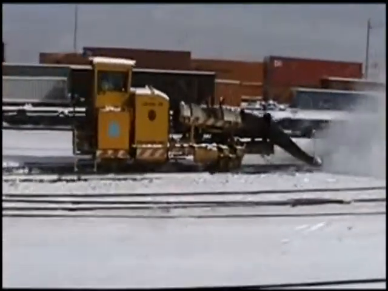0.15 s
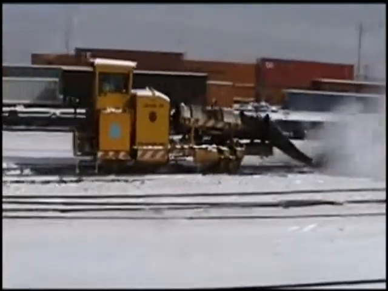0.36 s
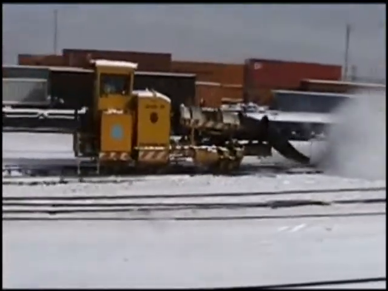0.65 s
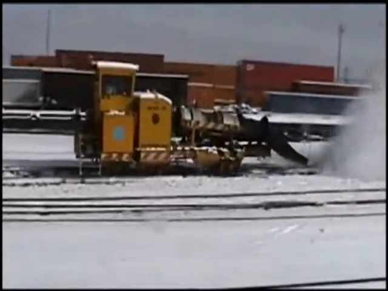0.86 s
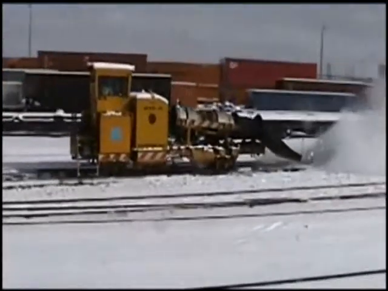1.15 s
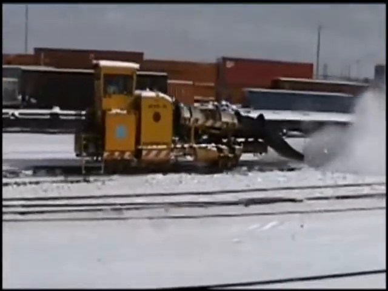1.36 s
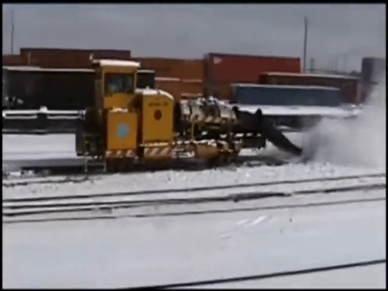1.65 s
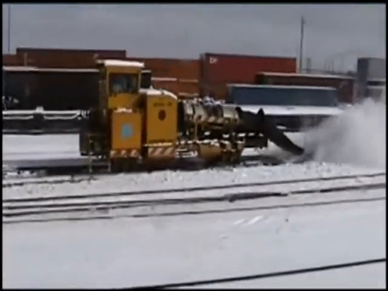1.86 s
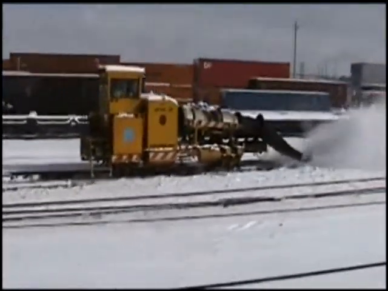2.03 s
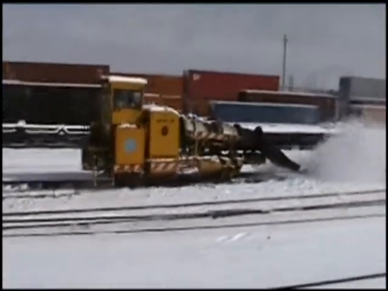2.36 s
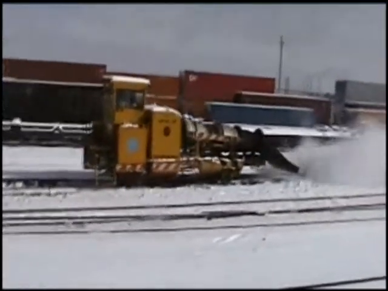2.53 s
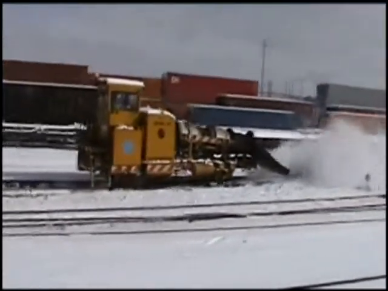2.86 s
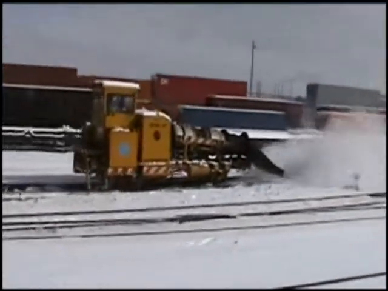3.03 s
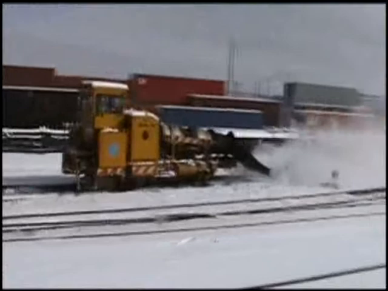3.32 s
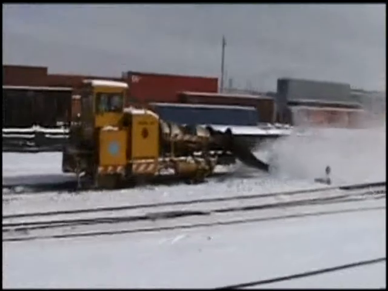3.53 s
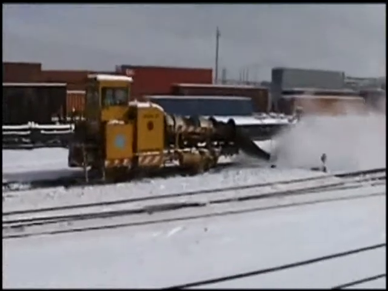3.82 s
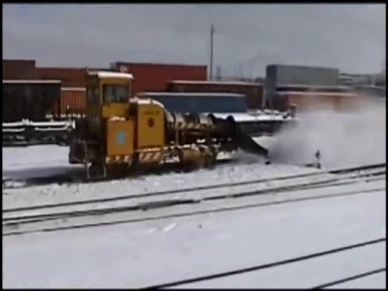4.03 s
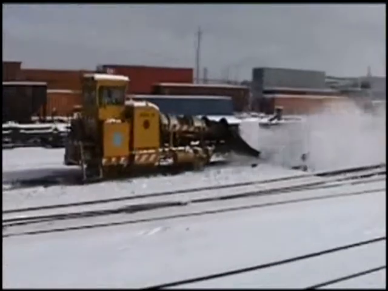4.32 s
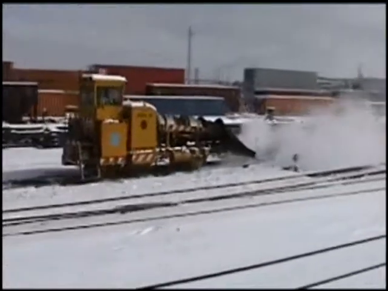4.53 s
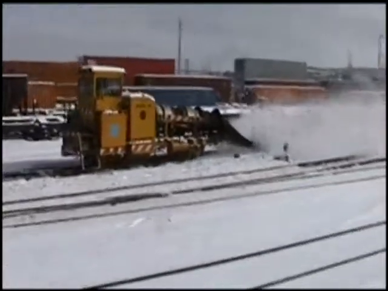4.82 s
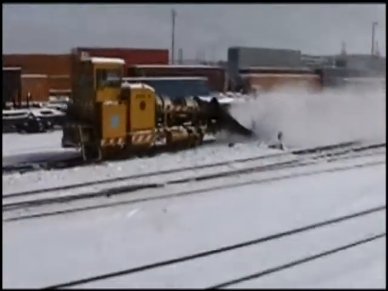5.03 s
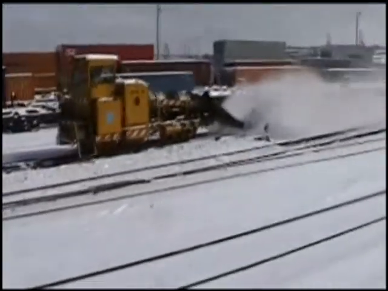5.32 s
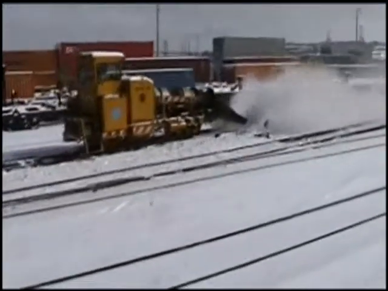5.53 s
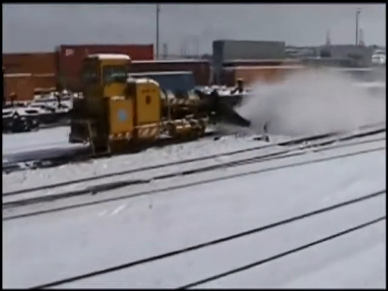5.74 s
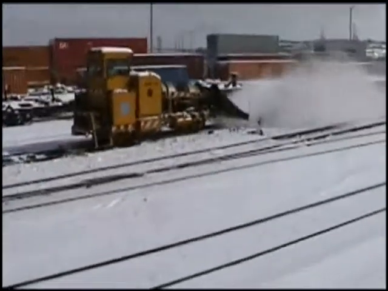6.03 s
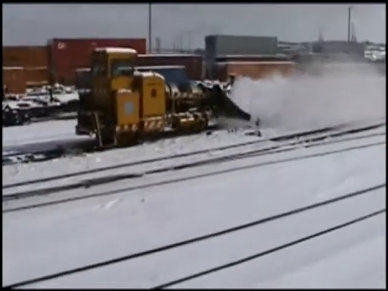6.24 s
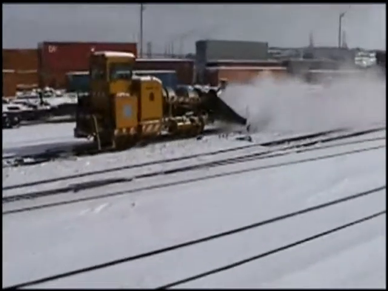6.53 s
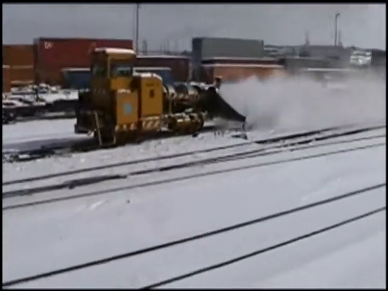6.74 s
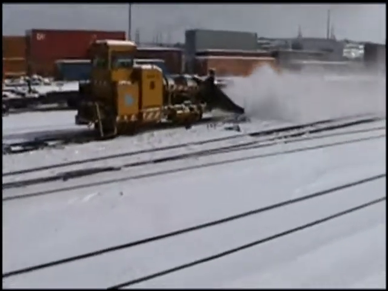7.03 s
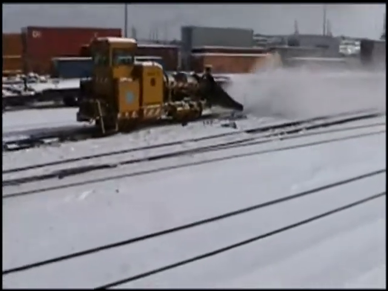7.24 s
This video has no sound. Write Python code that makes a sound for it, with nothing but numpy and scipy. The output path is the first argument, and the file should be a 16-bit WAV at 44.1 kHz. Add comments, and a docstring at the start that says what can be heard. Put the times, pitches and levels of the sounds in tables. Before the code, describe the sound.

A jet-powered snow blower creeps along rails in an open snowy yard, roaring without pause. Over the broad, hollow blast sits a rough metallic turbine whine, strongest at first. As it turns tail-on the whine loses its top and the roar grows more mid-heavy, while thin high whistles surge in gusts. A low, breathy moan climbs near the end. Small outdoor stereo camera microphone at some distance, narrow-band, peaks slightly squashed.

```python
"""A jet snow blower on rails roars at the snow of a rail yard as it creeps past: noise shaped by frequency.
Its blades whine on multiples of a nearly steady shaft speed, over a faint echo of steady tones.
As it turns from side-on to tail-on the whine loses its top; drifting air makes every tone flutter.
Gusts make two high whistles surge, over a nearly steady band of hiss, a low whistle and faint gear tones.
Late on, a hollow moan climbs out of the blast; the camera's input slightly rounds off the loud peaks."""
import sys
import numpy as np
from scipy import signal
from scipy.io import wavfile
from scipy.ndimage import uniform_filter1d

SR = 44100
rng = np.random.default_rng(int(sys.argv[2]) if len(sys.argv) > 2 else 0)


def log_audio(samples):
    """Write samples as a 16-bit WAV file to the path given in sys.argv[1]."""
    # one column per channel
    frames = np.atleast_2d(samples).T
    # limit to full scale, then quantise
    limited = np.clip(frames, -1, 1)
    pcm = np.round(limited * 32767).astype(np.int16)
    wavfile.write(sys.argv[1], SR, pcm)


N = 325458
TIME = np.arange(N) / SR  # seconds, one value per sample
SLOW_TIME = np.linspace(0, N / SR, num=8192)  # seconds, a coarse grid for slow changes


def amp(db):
    """Turns decibels into a gain."""
    return 10 ** (np.asarray(db) / 20)


def evened(x):
    """Scales a signal to a mean power of one."""
    return x / np.sqrt(np.mean(abs(x) ** 2) + 1e-20)


def curves(rows, t=TIME):
    """Joins each column of a time table by straight lines."""
    seconds, *columns = np.transpose(rows)
    return [np.interp(t, seconds, column) for column in columns]


def read(rows, hz, axis=1):
    """Reads one column of a spectrum table, on a log-frequency axis."""
    table = np.transpose(rows)
    return np.interp(np.log(hz + 1), np.log(table[0] + 1), table[axis])


# which side of the machine faces us: time_s, view (0 is side-on, 1 is from behind)
VIEW = [(0, 0.13), (1, -0.058), (2, 0.12), (2.7, 0.25), (3.4, 0.59), (4.2, 0.86), (5, 0.92), (6, 1.08),
        (7.38, 1.1)]


def by_view(views, levels_db):
    """A sound that beams unevenly changes level as the machine turns."""
    return np.interp(curves(VIEW, SLOW_TIME)[0], views, levels_db)


# balance of the two microphones: pitch_hz, left_minus_right_db
BALANCE = [(50, 3.3), (200, 4.1), (600, 2), (950, .2), (1300, 0), (1620, .8), (1900, 0), (4400, -.2),
           (5000, 1.3), (5600, 0), (6700, .3), (7500, 1.6)]
# how far the left microphone leads the right: pitch_hz, lead_radians
LEAD = [(50, 0), (300, -.35), (750, -.4), (1400, -.04), (1620, -.2), (1950, 0), (4200, 0), (4800, .18),
        (5300, -.05), (7300, .16)]


def ports(hz):
    """Loudness and phase differences give a complex gain for the left and right microphone."""
    half = amp(read(BALANCE, hz) / 2) * np.exp(.5j * read(LEAD, hz))
    return np.array([half, 1 / half])


def drift(width_hz):
    """Slow complex chance of power one, with soft skirts beyond its width."""
    f = np.fft.fftfreq(len(SLOW_TIME), SLOW_TIME[1])
    a, b = rng.standard_normal((2, len(f)))
    return evened(np.fft.ifft((a + 1j * b) / (1 + (f / width_hz) ** 2)))


# how alike the two microphones hear a sound: pitch_hz, likeness (0 to 1)
LIKENESS = [(40, .2), (120, .62), (250, .89), (480, .77), (650, .93), (1100, .95), (2000, .995),
            (2700, .9998), (3350, .9998), (3700, .98), (4500, .92), (6300, .92), (7200, .82)]


def tone(hz, db, scatter, width_hz, fuzz_db=None):
    """A tone arrives partly direct and partly scattered by moving air, so that it flutters."""
    share, centre_hz = np.clip(scatter, 0, 1), np.mean(hz)
    paths = np.sqrt(1 - share) + np.sqrt(share) * drift(width_hz)
    if fuzz_db is not None:  # fast eddies in the hot exhaust smear it into a skirt of noise
        paths = paths + amp(fuzz_db) * drift(width_hz=73)
    # reflections from the yard reach the two microphones unlike
    unlike = np.sqrt((1 - read(LIKENESS, centre_hz)) / 2) * drift(width_hz)
    pair = np.array([paths + unlike, paths - unlike]) * ports(centre_hz)[:, None]
    # pitch changes are added up as turns, from a random starting phase
    offset_hz = (hz - centre_hz) * np.ones(len(SLOW_TIME))
    turns = np.cumsum(offset_hz) * SLOW_TIME[1] + rng.random()
    pair = pair * np.sqrt(2) * amp(db) * np.exp(2j * np.pi * turns)
    carrier = np.exp(2j * np.pi * centre_hz * TIME)
    return np.array([(np.interp(TIME, SLOW_TIME, side) * carrier).real for side in pair])


def turbulence(field_db, patchy_db, size=2048):
    """Stereo noise gets its density from field_db(s, Hz) and is broken into drifting patches."""
    hop = size // 4
    t = np.arange(N // hop + 3) * hop / SR
    hz = np.fft.rfftfreq(size, 1 / SR)
    a, b, c, d, patches = rng.standard_normal((5, len(t), len(hz)))
    patches = uniform_filter1d(patches, size=12, axis=0)  # smooth over time
    patches = evened(uniform_filter1d(patches, size=24, axis=1))  # smooth over pitch
    same = np.clip(read(LIKENESS, hz), -1, 1)
    left = a + 1j * b
    right = same * left + np.sqrt(1 - same ** 2) * (c + 1j * d)
    z = np.array([left, right]) * ports(hz)[:, None]
    z *= amp(field_db(t, hz) + patchy_db * patches) * np.sqrt(1.5 * SR / size)
    return signal.istft(z.swapaxes(-1, -2), nperseg=size, noverlap=size - hop)[1][:, :N]


# faint steady gear tones: pitch_hz, level_db
GEAR_TONES = [(1229, -51), (1507, -51.5)]


def gears():
    """The gears hum on fixed pitches, fluttering slowly in the air."""
    return sum(tone(hz, db, scatter=0.25, width_hz=4.4) for hz, db in GEAR_TONES)


# level of the low whistle: time_s, level_db
LOW_WHISTLE_DB = [(0, -48), (1.9, -44.5), (2.1, -42), (3, -38), (3.12, -36.5), (4.3, -35.5), (5.1, -38),
                  (5.8, -36.5), (7.38, -43.5)]


def low_whistle():
    """One clean whistle keeps a pitch unrelated to the shaft while its level wanders."""
    level_db = curves(LOW_WHISTLE_DB, SLOW_TIME)[0]
    return tone(1619.2, level_db, scatter=0.06, width_hz=12, fuzz_db=-19.0)


# gusts that make the high whistles surge: start_s, length_s, lower_whistle_db, upper_whistle_db
SURGES = [(1.3, .22, -44, -52), (2.43, 0.35, -41, -53), (2.8, 0.25, -48, -44), (3.3, 0.29, -40, -41),
          (4.248, 0.23, -56, -42), (4.6, 0.48, -41, -38.5), (5.157, 0.3, -43, -36.5),
          (5.72, 0.39, -48, -43.5), (6.002, 0.28, -37.5, -41), (6.235, 0.37, -41.5, -44.5),
          (6.61, 0.34, -45, -41.5), (6.95, 0.67, -39.5, -58)]


def surges():
    """Gusts add power to each high whistle: a quick rise, a hold and a fall."""
    attack_s, release_s = .08, 0.14
    power = np.zeros((2, len(SLOW_TIME)))
    for start, length, *db in SURGES:
        age = SLOW_TIME - start
        shape = np.clip(np.minimum(age / attack_s, (length - age) / release_s), 0, 1)
        power += (amp(db)[:, None] * shape) ** 2
    return power


# the two high whistles between surges: pitch_hz, side_on_db, from_behind_db
HIGH_WHISTLES = [(4376, -50.5, -47.5), (4821, -49, -45.5)]


def high_whistles():
    """Two fuzzy whistles hold their pitch and swell as gusts add to their calm power."""
    total = 0
    for (hz, *calm_db), surge in zip(HIGH_WHISTLES, surges()):
        power = amp(by_view([0, 1], calm_db)) ** 2 + surge
        total = total + tone(hz, 10 * np.log10(power), scatter=0.24, width_hz=14, fuzz_db=-9.5)
    return total


# shape of the rush of air through the blades, before its overall level is set: pitch_hz, relative_db
RUSH = [(3600, -27), (4150, -3.5), (4400, 0), (4650, -3.5), (4850, -6), (5150, -5.5), (5600, -28.5)]


def rush():
    """Air rushing through the blades hisses almost steadily around the high whistles."""
    hiss = evened(turbulence(lambda t, hz: read(RUSH, hz), patchy_db=1.4))
    calm_db = by_view([0, 1], [-43.5, -42.5])
    surge_db = -14.5  # relative to the power of the whistle surges, so it barely lifts the hiss
    power = amp(calm_db) ** 2 + amp(surge_db) ** 2 * surges().sum(axis=0)
    return hiss * np.interp(TIME, SLOW_TIME, np.sqrt(power))


# a hollow moan that climbs as the machine turns: time_s, pitch_hz, level_db
MOAN = [(4.4, 785, -63), (4.9, 787, -47), (5.55, 780, -49), (5.9, 942.4, -50.5), (6.45, 934, -56),
        (6.65, 1003, -51.5), (6.9, 1030, -40.5), (7.38, 1034, -42)]


def moan():
    """A breathy, wavering note rises out of the blast, mostly scattered by the air."""
    hz, db = curves(MOAN, SLOW_TIME)
    return tone(hz, db, scatter=.7, width_hz=20, fuzz_db=-10.5)


# shaft speed as heard: time_s, turns_per_second
SHAFT = [(0, 55.53), (2.3, 55.5), (3.8, 55.41), (5, 55.45), (7.38, 55.42)]


def shaft_speed():
    """The turning shaft sets the pitch of every directly heard blade tone."""
    return curves(SHAFT, SLOW_TIME)[0]


# weaker tones, before a shared lift of 1.05 dB: shaft_multiple, side_on_db, slanted_db, from_behind_db
SHAFT_TONES = [(37, -47, -50, -57), (38, -54, -59, -60), (39, -61, -59, -69), (42, -61, -60, -70),
               (46, -57, -61, -68), (49, -57, -59, -67), (51, -52, -53, -61), (53, -61, -52, -57),
               (64, -53, -56, -61), (65, -44, -47, -53), (66, -61, -67, -69), (80, -54, -54, -65),
               (81, -46, -46, -57), (83, -54, -56, -63), (84, -58, -56, -65), (92, -50, -51, -66),
               (93, -59, -64, -65), (101, -59, -68, -71), (108, -59, -61, -62), (109, -61, -62, -70),
               (110, -48, -67, -64), (111, -60, -68, -72), (119, -55, -55, -69), (129, -62, -61, -73)]


def weak_blade_tones():
    """Weaker multiples of the shaft speed beam unevenly, and flutter more from behind."""
    speed, behind = shaft_speed(), np.clip(curves(VIEW, SLOW_TIME)[0], 0, 1)
    total = 0
    for multiple, *beam_db in SHAFT_TONES:
        level_db = by_view([.08, .22, .58], beam_db)
        total = total + tone(multiple * speed, level_db, scatter=0.15 + .5 * behind,
                             width_hz=10.0, fuzz_db=-10.5)
    return amp(1.05) * total


# level of the lower whine, near 1.5 kHz, and of the upper, near 3 kHz: time_s, level_db
LOW_WHINE_DB = [(0, -38), (.2, -42), (.35, -36.5), (1.2, -39), (1.4, -39), (1.75, -38), (2.5, -44),
                (2.75, -39), (4.3, -43.5), (5.9, -41.5), (6.6, -39.5), (7.38, -47)]
HIGH_WHINE_DB = [(0, -35), (.25, -31.5), (.45, -36), (.7, -33), (1.1, -33), (1.35, -36.5), (2.85, -35),
                 (3.15, -38.5), (3.85, -34.5), (4.2, -37.5), (4.55, -39), (4.78, -47), (5.3, -37.5),
                 (5.9, -44.5), (7.38, -43)]
# tones of each whine, relative to its level: shaft_multiple, side_on_db, slanted_db, from_behind_db
LOW_WHINE = [(27, -1.5, -3.5, -2.5), (28, -2, -8.5, -13)]
HIGH_WHINE = [(54, -2, 0.5, -2.5), (55, -4.5, -12.5, 0), (56, -12.5, -18, -11)]
# when the blades are heard side-on, at a slant and from behind: time_s
TURN_S = [0.28, 4.2, 6.7]


def blade_whine():
    """Strong blade tones one shaft turn apart beat into a rough whine."""
    speed, behind = shaft_speed(), np.clip(curves(VIEW, SLOW_TIME)[0], 0, 1)
    total = 0
    for level, tones in [(LOW_WHINE_DB, LOW_WHINE), (HIGH_WHINE_DB, HIGH_WHINE)]:
        whine_db = curves(level, SLOW_TIME)[0]
        for multiple, *share_db in tones:
            level_db = whine_db + np.interp(SLOW_TIME, TURN_S, share_db)
            total = total + tone(multiple * speed, level_db, scatter=0.021 + 0.09 * behind,
                                 width_hz=11, fuzz_db=-20.0)
    return total


def blade_echo():
    """An echo from across the yard keeps its pitch as the direct whine sags, so the two beat."""
    echo_shaft, echo_db = 55.55, -51  # turns per second; dB for each tone
    return sum(tone(multiple * echo_shaft, echo_db, scatter=0.1, width_hz=5)
               for multiple, *_ in LOW_WHINE + HIGH_WHINE)


def hump(hz, centre_hz, width_hz, db):
    """One resonance lifts a noise by some decibels around its centre."""
    return db / (1 + (2 * (hz - centre_hz) / width_hz) ** 2)


# jet roar, before the duct's lift and drifting patches: pitch_hz, side_on_db_per_hz, from_behind_db_per_hz
ROAR = [(25, -99.5, -99), (55, -75, -80.5), (125, -76.5, -78), (170, -69.5, -72.5), (260, -67.5, -71.5),
        (522, -76.5, -74.5), (584, -67.5, -68.5), (790, -70, -65.5), (1050, -65.5, -64),
        (1044, -70.5, -69.5), (1660, -68.5, -70), (2500, -71.5, -75.5), (2750, -67, -73.5),
        (4100, -73.5, -74.5), (6300, -77, -81), (7660, -74.5, -83)]
# a hollow resonance of the nozzle duct: pitch_hz, width_hz, lift_db
DUCT = (255, 15, 4.9)


def roar():
    """The jet mixes with still air; from behind, its middle grows and its hiss fades."""
    def field_db(t, hz):
        view = curves(VIEW, t)[0][:, None]
        side_on, from_behind = read(ROAR, hz, axis=1), read(ROAR, hz, axis=2)
        return (1 - view) * side_on + view * from_behind + hump(hz, *DUCT)
    return turbulence(field_db, patchy_db=1.14)


def scene():
    """The whole machine, heard across the snow."""
    whistles = low_whistle() + high_whistles()
    blades = weak_blade_tones() + blade_whine() + blade_echo()
    return gears() + whistles + rush() + moan() + blades + roar()


def record(dry):
    """A small camera's overloaded input rounds off the peaks, and its band is narrow."""
    input_db, ceiling, edge_hz = -0.02, .09, 7770  # ceiling: full scale is 1
    driven = amp(input_db) * dry
    rounded = driven / (1 + (driven / ceiling) ** 6) ** (1 / 6)
    edge = signal.firwin(2047, edge_hz, window=("kaiser", 9), fs=SR)  # steep low-pass
    return signal.oaconvolve(rounded, edge[None], "same")


dry = scene()
out = record(dry)
log_audio(out)
```